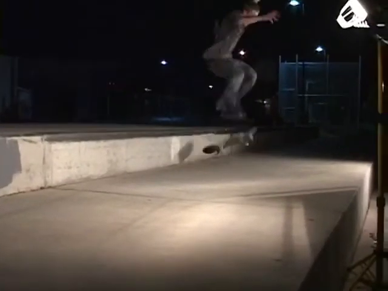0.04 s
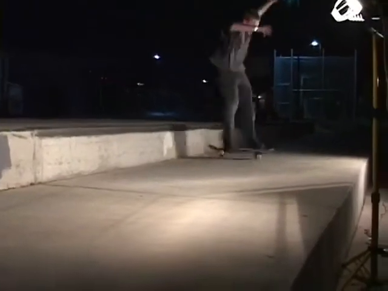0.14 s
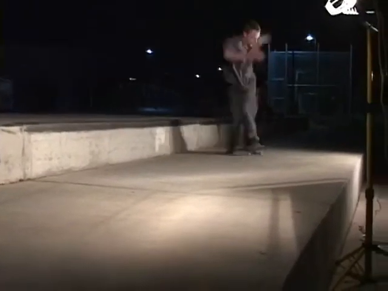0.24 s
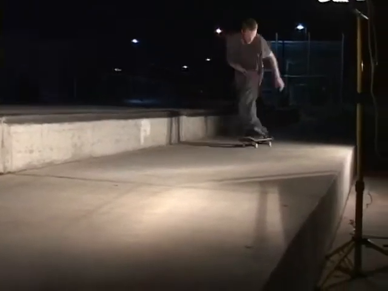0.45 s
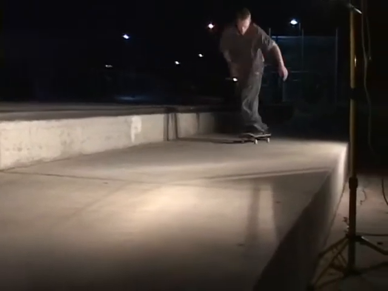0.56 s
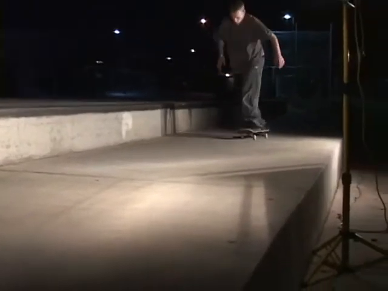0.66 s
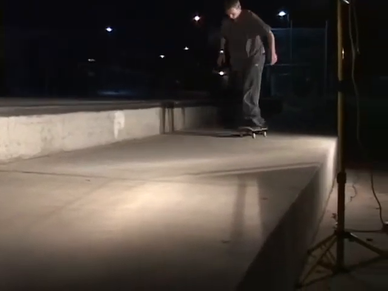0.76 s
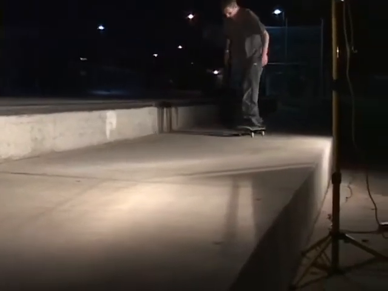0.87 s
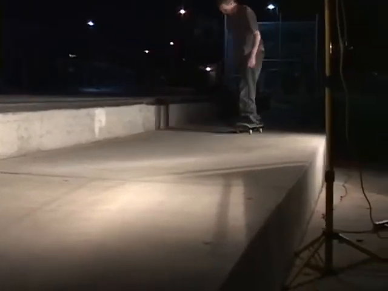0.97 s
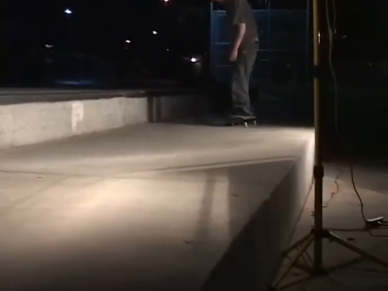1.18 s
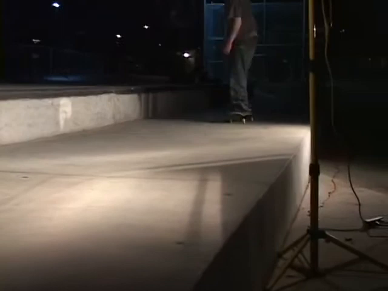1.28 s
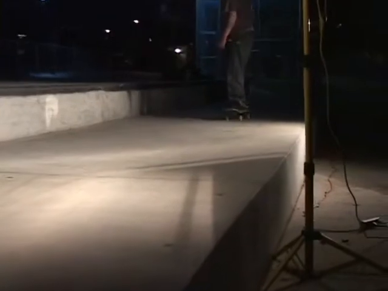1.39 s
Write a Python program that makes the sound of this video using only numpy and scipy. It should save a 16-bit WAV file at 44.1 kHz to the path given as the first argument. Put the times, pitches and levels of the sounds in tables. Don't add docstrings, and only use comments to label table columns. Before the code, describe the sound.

Free wheels whirr softly over a low generator hum, then a board slams down in a burst of woody, metallic cracks, scrapes sideways, and rolls away quieter across two slab joints, with a weak outdoor echo.

```python
import sys
import numpy as np
from scipy import signal
from scipy.fft import rfft, irfft, next_fast_len
from scipy.io import wavfile
from scipy.ndimage import uniform_filter1d, map_coordinates

SR = 44100
rng = np.random.default_rng(int(sys.argv[2]) if len(sys.argv) > 2 else 0)


def rack_gain(trim_db):
    fader = np.asarray(trim_db, float)
    return 10 ** (fader / 20)


def unload_wav(signal):
    wavfile.write(
        sys.argv[1],
        SR,
        np.round(np.clip(np.atleast_2d(signal).T, -1, 1) * 32767).astype(np.int16),
    )


N = 63945
TIME = np.arange(N) / SR

# f/Hz, density/dB
NIGHT_SPECTRUM = [(15, -40), (30, -13), (60, -6.5), (100, -4), (125, -3), (155, -3.5), (200, -14.5),
                  (300, -10.5), (500, -28)]
# f/Hz, width/Hz, level/dB
GENERATOR_ORDERS = [(76.7, 9.4, -4.5), (100, 8.5, -1.5), (155, 6.5, -0.5), (1042, 19, -7), (1490, 30, -21)]
# f/Hz, density/dB
AIR_SPECTRUM = [(300, -29), (600, 0), (1500, -1), (2500, -24), (6000, -15.5), (11000, -30), (16000, -20)]
NIGHT_DB, ORDERS_DB, AIR_DB = -38.5, -41.5, -51.5

YARD_T60_S, YARD_DB = 0.58, -23

# t/s, length/s, start f/Hz, end f/Hz, level/dB
SQUEAKS = [(0.561, 0.043, 7840, 7260, -52), (0.699, 0.026, 7200, 7600, -47.5),
           (0.758, 0.031, 8100, 8600, -56), (0.855, 0.027, 6500, 7350, -48), (0.924, .024, 9100, 8040, -54),
           (0.95, 0.013, 7400, 6000, -59), (1.021, 0.036, 7200, 7700, -51), (1.055, 0.011, 8400, 8600, -52),
           (1.104, 0.019, 8100, 8050, -52.5), (1.18, .02, 6000, 6300, -56), (1.195, 0.029, 7100, 6900, -54),
           (1.42, 0.021, 6700, 7520, -53.5)]
SQUEAK_ROUGH_HZ = 250

# f/Hz, width/Hz, level/dB
AXLE_MODES = [(2870, 71, -.5), (3500, 62, -4)]
ROUGH_PATCH_S, ROUGH_LENGTH_S, ROUGH_DB = 1.257, 0.028, -53.5

# t/s, level/dB, hiss over hum/dB
ROLL = [(0, -44.5, -0.5), (0.071, -41.5, -4.5), (.1, -36.5, -7), (0.194, -44.5, -3), (.215, -34, 3.5),
        (0.311, -24, -12), (0.349, -21.5, -6.5), (.362, -21.5, -14), (.48, -31.5, -13), (.51, -33.5, -9),
        (.61, -36, -11.5), (.78, -38, -11.5), (.84, -40, -14), (.97, -42.5, -10), (1.15, -41, -14),
        (1.25, -42.5, -9.5), (1.33, -43, -11.5), (1.45, -43, -11)]
# f/Hz, width/Hz, level/dB
ROLL_MODES = [(265, 76, -5.5), (555, 104, 0), (1013, 105, 1.5), (1502, 176, -3.5), (1920, 170, -7.5),
              (2760, 350, -16.5)]
# f/Hz, density/dB
GRIT_SPECTRUM = [(2000, 0), (2800, 3), (3400, -4), (4500, 1.5), (6000, -3), (8500, -4), (11500, -13),
                 (16000, -31)]
GRIT_PER_S, GRIT_SCATTER_DB, GRIT_HISS_DB = 9500, 1.5, -1.5
PATCH_DB = 3

# t/s, level/dB
LOW_BUMPS = [
    (.212, -21.5),
    (.262, -24),
    (.285, -25),
]
LOW_BUMP_S = 0.0061

# t/s, level/dB
WEIGHT = [
    (0.2052, -5.5),
    (.249, -7),
    (0.276, -3.5),
    (0.344, -27),
    (.622, -11),
    (.867, -23),
    (0.883, -18.5),
]
# f/Hz, width/Hz, level/dB
THUD_MODES = [(247, 67, -0.5), (314, 46, -1.5), (468.5, 39, 0.5), (691, 146, 2)]
PUSH_S = 0.00023

# t/s, level/dB
SKID = [
    (.42, -18),
    (.433, -21.5),
    (.44, -8),
    (.449, -1.5),
    (.455, -5.5),
    (.465, -7),
    (.473, 0),
    (.4815, -5.5),
    (.494, -37),
]
# f/Hz, width/Hz, level/dB
SKID_MODES = [(595, 230, -11), (930, 98, -6), (1340, 110, -2), (1820, 105, 2.5), (2036, 91, 1),
              (2780, 120, -8.5), (3400, 54, -19), (4850, 68, -9)]
SLIPS_PER_S, SLIP_SCATTER_DB, SKID_HISS_DB, SLIDE_RING_DB = 4600, 2.5, -14.5, -7.5
STEADY = 0.99

# t/s, length/s, start f/Hz, end f/Hz, peak level/dB
BOARD_RINGS = [(0.21, 0.015, 240, 280, -10.5), (.206, 0.021, 454, 606, -9), (.207, 0.0069, 1056, 1200, -10),
               (0.21, .03, 1270, 1520, -10.5), (0.21, 0.022, 1950, 1980, -10.5),
               (0.2487, 0.019, 1940, 2030, -12.5), (0.26, 0.0075, 680, 620, -16),
               (0.246, .011, 1380, 1500, -13), (.2755, 0.019, 1370, 1450, -3.5),
               (.281, 0.026, 1015, 988, -5.5), (.277, 0.018, 1900, 1920, -10.5),
               (0.329, 0.089, 300, 263, -27.5), (.369, 0.0091, 1145, 930, -8),
               (0.38, 0.0082, 1874, 1870, -11), (.387, .012, 1162, 965, -8), (0.38, 0.0071, 2380, 2600, -16),
               (0.4, .012, 1047, 1093, -11), (.4, 0.0071, 2000, 1870, -19), (0.414, 0.0077, 1060, 990, -12),
               (.439, 0.019, 1880, 1800, -5), (0.44, 0.0075, 2140, 2400, -11), (.453, .011, 1310, 1370, -6),
               (0.47, 0.02, 1310, 1390, -7.5), (0.46, 0.028, 2080, 2050, -8.5),
               (.441, 0.022, 2800, 3000, -14), (.47, 0.0273, 691, 522, -19),
               (.468, 0.013, 3350, 3380, -16.5), (.621, .012, 1620, 1760, -15.5),
               (.622, 0.0091, 1070, 920, -20), (0.63, 0.0051, 1900, 1950, -10.5),
               (0.63, .014, 1030, 1064, -14), (0.65, 0.018, 1065, 1030, -21),
               (0.63, 0.022, 2050, 1940, -18.5), (.8655, 0.0092, 960, 990, -15),
               (.867, 0.012, 650, 580, -21.5), (0.88, 0.0072, 205, 230, -19), (.881, 0.0051, 180, 150, -22),
               (0.9, 0.013, 1580, 1625, -27), (.879, .01, 1960, 1930, -27.5), (0.887, 0.02, 520, 500, -29.5),
               (.206, 0.011, 2630, 2550, -10.5), (.2065, 0.011, 3500, 3450, -12.5),
               (.468, 0.018, 4850, 4860, -20)]
RING_PEAK, RING_ROUGH_DB = 0.54, 1

# t/s, deck level/dB, chatter t60/s, tilt/(dB per octave), crack over deck/dB
CONTACTS = [(0.2062, 2.5, 0.046, 3.5, -16), (0.2133, -11, 0.025, -8, 1.5), (0.2225, -6, 0.032, -2.5, -9),
            (0.2371, -19, 0.034, -4, -1), (0.2488, 4.5, 0.02, 3, -9.5), (0.2561, -9.5, 0.15, -8.5, -13),
            (0.2762, 2.5, 0.039, 3.5, -11), (.283, 2.5, 0.019, -11, -10.5),
            (0.2938, -9.5, 0.051, -24, -9.5), (0.3702, 0.5, 0.022, 0, -7), (0.3877, -4, 0.027, -9, -1.5),
            (0.4011, -2.5, 0.02, -0.5, -12), (0.4142, -8, 0.022, -2, -10), (0.43, -8.5, 0.032, -4, -22),
            (.6216, -9, 0.1, -5, -16), (0.6351, 1.5, .016, 4, -11), (0.6413, -21, 0.053, -17, -12),
            (0.6503, -21.5, 0.019, -14, -6.5), (.866, -15.5, 0.056, -4, -8),
            (0.8814, -20.5, 0.061, 6, -1.5), (0.8895, -33, 0.025, -3, 4), (1.066, -54, 0.016, 2, 17),
            (1.3, -39.5, 0.02, 15.5, -11), (1.35, -40, 0.029, 8, -2.5)]
# f/Hz, width/Hz, then level/dB free on landing, under the feet,
# at a front-loaded joint, at a back-loaded joint
DECK_MODES = [(591, 60, -2.5, -17, -8, 7), (874, 204, 0.5, 0, -5, -3), (1022, 93, -3.5, 0, 5, -0.5),
              (1334, 160, 3, 6.5, 2, 1), (1602, 63, -5.5, -6, -7, -2.5), (1843, 91, -6.5, 1, -21, -8),
              (2060, 58, 0, -0.5, -16, -32), (2370, 290, -4, -3.5, -31, -21), (3350, 88, -3, -8, -41, -15),
              (5200, 520, -9, -1.5, -13.5, -21)]
# f/Hz, density/dB
CRACK_SPECTRUM = [(1500, -3), (3000, 3.5), (5500, -2), (8000, 1), (11000, -6.5), (13500, -17), (16000, -24)]
# f/Hz, width/Hz, level/dB
TRUCK_MODES = [(3450, 240, -0.42), (4200, 140, -1), (4990, 470, 1), (5870, 200, 0), (6970, 440, -1.8)]
TRUCK_SHARE = 0.58
SCATTER_DB, RISE_S, CHATTER_DB = 3.5, 0.00029, -7.5
FEET_DOWN_S, ROLLING_S, LEAN_BACK_S = 0.27, 0.55, 0.8
WOOD_TOP_HZ, WOOD_LOW_HZ = 5130, 380

CLIP_TOP, CLIP_HARD = 1, 10


def unit(x):
    return x / np.sqrt(np.mean(x ** 2) + 1e-20)


def level(rows):
    return rack_gain(np.interp(TIME, *np.transpose(rows)))


def wobble(rate):
    knots = rng.standard_normal(int(N * rate / SR) + 4)
    return map_coordinates(knots, [np.arange(N) * rate / SR])


def bell(centre_s, width_s):
    return np.exp(-0.5 * ((TIME - centre_s) / width_s) ** 2)


def filtered(x, response):
    m = next_fast_len(len(x) + 8192)
    return irfft(rfft(x, m) * response(np.fft.rfftfreq(m, 1 / SR)), m)[:len(x)]


def colour(points):
    f, db = np.transpose(points)
    return lambda hz: rack_gain(np.interp(np.log(hz + 1), np.log(f + 1), db, left=-120, right=-120))


def body(modes):
    def response(f):
        total = 0
        for k, (centre, width, db) in enumerate(modes):
            damping = 1j * f * width
            total = total + (-1) ** k * rack_gain(db) * damping / (centre * centre - f * f + damping)
        return total
    return response


def wood(f):
    highpass = 1j * f / (WOOD_LOW_HZ + 1j * f)
    lowpass = WOOD_TOP_HZ / (WOOD_TOP_HZ + 1j * f)
    return (highpass * lowpass) ** 2


def metal(truck_gain):
    return lambda f: colour(CRACK_SPECTRUM)(f) * (TRUCK_SHARE + truck_gain * np.abs(body(TRUCK_MODES)(f)))


def grains(per_s, scatter_db):
    chance, side, size = rng.random((3, N))
    return (chance < per_s / SR) * np.sign(side - 0.5) * rack_gain(-scatter_db * np.log(size + 0.0012))


def patchy(x, depth_db):
    z = signal.stft(x, nperseg=256)[2]
    field = uniform_filter1d(rng.standard_normal(z.shape), size=3, axis=0)
    field = uniform_filter1d(field, size=12, axis=1)
    return signal.istft(z * rack_gain(depth_db * unit(field)), nperseg=256)[1][:N]


def night():
    drone = unit(filtered(rng.standard_normal(N), colour(NIGHT_SPECTRUM))) * rack_gain(0.76 * wobble(29.2))
    orders = unit(filtered(rng.standard_normal(N),
                           lambda f: sum(body([line])(f) ** 2 for line in GENERATOR_ORDERS)))
    air = unit(filtered(rng.standard_normal(N), colour(AIR_SPECTRUM)))
    return rack_gain(NIGHT_DB) * drone + rack_gain(ORDERS_DB) * orders + rack_gain(AIR_DB) * air


def yard(x):
    t = np.arange(SR // 2) / SR
    tail = rng.standard_normal(len(t)) * rack_gain(-60 * t / YARD_T60_S) * (t > 0.008)
    answer = signal.fftconvolve(x, tail / np.linalg.norm(tail))[:N]
    return filtered(answer, lambda hz: 1 / (1 + hz / 4000))


def bearings():
    out = np.zeros(N + SR)
    for s, length, start_hz, end_hz, db in SQUEAKS:
        rough = uniform_filter1d(rng.standard_normal((2, 4096)), size=40, axis=1) * 8.1
        u = np.linspace(0, 1, max(int(length * SR), 8))
        pitch_rough, level_rough = rough[:, :len(u)]
        hz = start_hz + (end_hz - start_hz) * u + SQUEAK_ROUGH_HZ * pitch_rough
        swell = rack_gain(db + 2.0 + 2.9 * level_rough) * np.sin(np.pi * u) ** 0.65
        out[round(s * SR):][:len(u)] += swell * np.sin(2 * np.pi * np.cumsum(hz) / SR)
    return out[:N]


def rough_patch():
    ring = unit(filtered(filtered(rng.standard_normal(N), body(AXLE_MODES)), wood))
    return rack_gain(ROUGH_DB) * bell(ROUGH_PATCH_S, ROUGH_LENGTH_S) * ring


def rolling():
    grit = grains(GRIT_PER_S, GRIT_SCATTER_DB)
    rows = np.array(ROLL)
    hum = unit(filtered(grit, body(ROLL_MODES))) * rack_gain(0.38 * wobble(24.8))
    hiss = filtered(unit(grit) + 1.15 * rng.standard_normal(N), colour(GRIT_SPECTRUM))
    hiss = unit(patchy(hiss, PATCH_DB)) * rack_gain(GRIT_HISS_DB + 2.0 * wobble(30.1))
    return level(rows[:, [0, 1]]) * (hum + level(rows[:, [0, 2]]) * hiss)


def low_bumps():
    bumps = sum(rack_gain(db) * bell(s, LOW_BUMP_S) for s, db in LOW_BUMPS)
    return filtered(bumps, lambda f: 1j * f / (18 + 1j * f))


def weight():
    push = sum(rack_gain(db) * bell(s + 0.001, PUSH_S) for s, db in WEIGHT)
    return 3 * filtered(filtered(push, body(THUD_MODES)), lambda f: 1j * f / (150 + 1j * f))


def skid():
    gain = level(SKID) * (TIME > SKID[0][0]) * (TIME < SKID[-1][0])
    slips = unit(grains(SLIPS_PER_S, SLIP_SCATTER_DB))
    hiss = unit(filtered(slips + rng.standard_normal(N), metal(1)))
    ring = unit(filtered(filtered(slips, body(SKID_MODES)), wood))
    power = np.abs(uniform_filter1d(ring ** 2, size=220))
    ring = ring / (power + 0.036) ** (STEADY / 2)
    return gain * (rack_gain(SLIDE_RING_DB) * ring + rack_gain(SKID_HISS_DB) * hiss)


def rings():
    out, rough_db = np.zeros(N + SR), RING_ROUGH_DB * wobble(300)
    for s, length, start_hz, end_hz, db in BOARD_RINGS:
        u = np.linspace(0, 1, max(int(length * SR), 8))
        phase = 2 * np.pi * np.cumsum(start_hz + (end_hz - start_hz) * u) / SR
        out[round(s * SR):][:len(u)] += rack_gain(db) * np.sin(np.pi * u ** RING_PEAK) * np.sin(phase)
    return out[:N] * rack_gain(rough_db)


def contacts():
    out, t = np.zeros(N + SR), np.arange(SR // 8) / SR
    for s, db, t60, tilt_db, crack_db in CONTACTS:
        deck_noise, crack_noise = rng.standard_normal((2, len(t)))
        spread = rng.standard_normal(len(DECK_MODES))
        shape = rack_gain(-60 * t / t60) * (1 - np.exp(-t / RISE_S))
        stance = int(s > FEET_DOWN_S) + int(s > ROLLING_S) + int(s > LEAN_BACK_S)
        deck = 0
        for (hz, width, *levels_db), chance in zip(DECK_MODES, spread):
            ring = unit(filtered(deck_noise * shape, body([(hz, width, 0)])))
            mode_db = levels_db[stance] + tilt_db * np.log2(hz / 1200) + SCATTER_DB * chance
            deck = deck + rack_gain(mode_db) * ring
        chatter = 0.42 * np.sqrt(t60) * rack_gain(CHATTER_DB) * filtered(deck, wood)
        crack = filtered(crack_noise, metal(1.29)) * shape ** 1.2
        out[round(s * SR):][:len(t)] += rack_gain(db) * (chatter + rack_gain(crack_db) * crack)
    return out[:N]


def scene():
    board = contacts() + weight() + skid() + rings()
    surroundings = rack_gain(YARD_DB) * yard(board) + night()
    travel = rolling() + bearings() + rough_patch()
    return (board + surroundings + travel + low_bumps())[None]


def low_pass(x):
    return signal.sosfilt(signal.butter(12, 15800, fs=SR, output="sos"), x)


def record(dry):
    clipped = dry / (1 + np.abs(dry / CLIP_TOP) ** CLIP_HARD) ** (1 / CLIP_HARD)
    return low_pass(clipped)


dry = scene()
out = record(dry)
unload_wav(out)
```